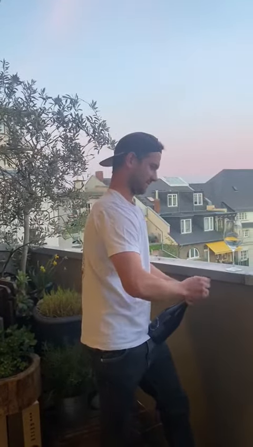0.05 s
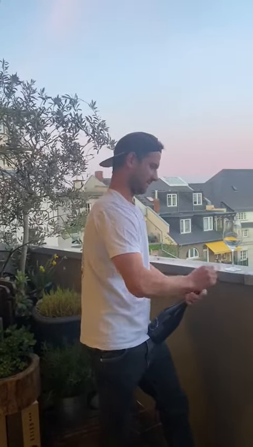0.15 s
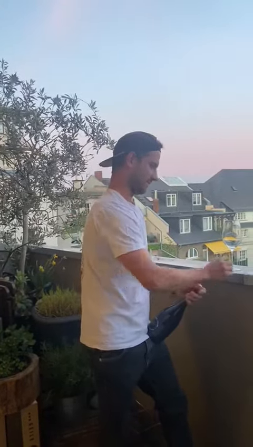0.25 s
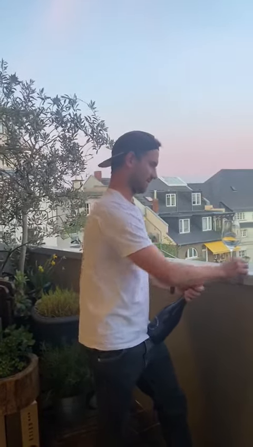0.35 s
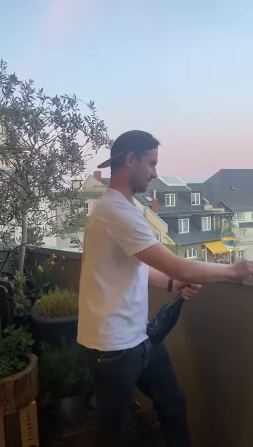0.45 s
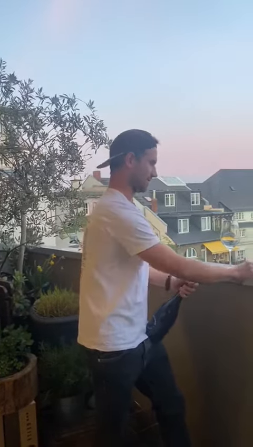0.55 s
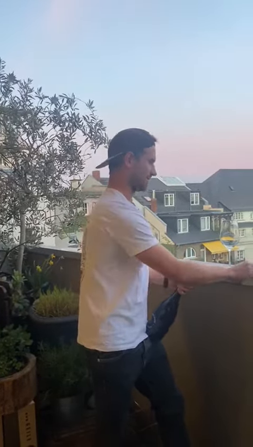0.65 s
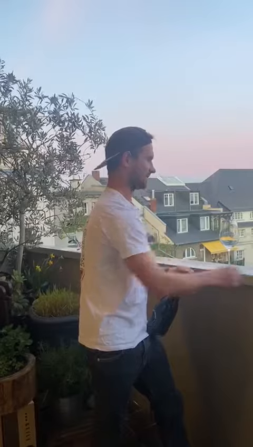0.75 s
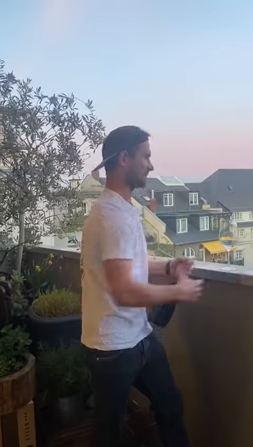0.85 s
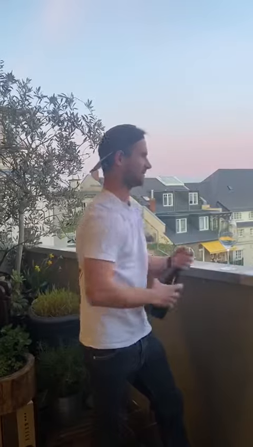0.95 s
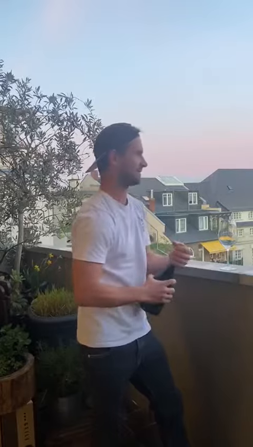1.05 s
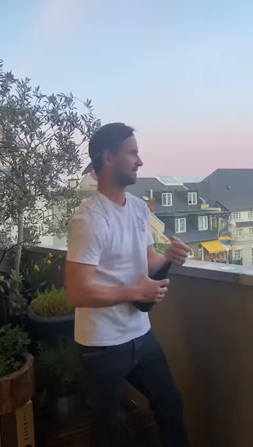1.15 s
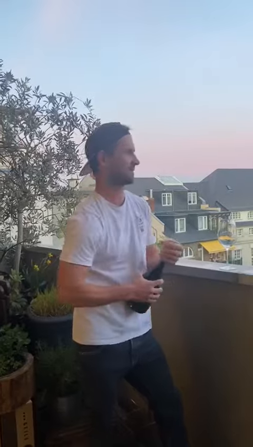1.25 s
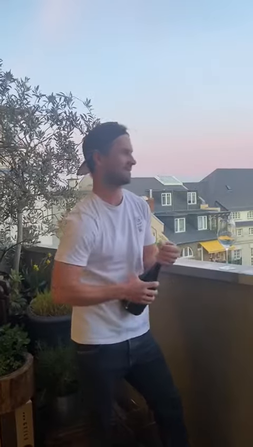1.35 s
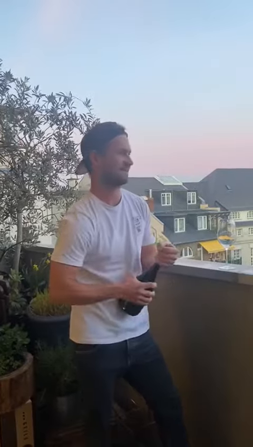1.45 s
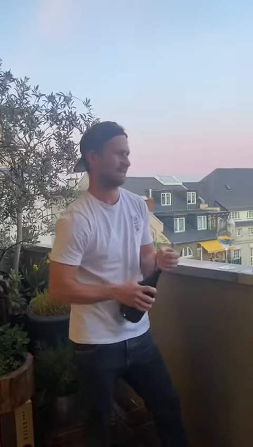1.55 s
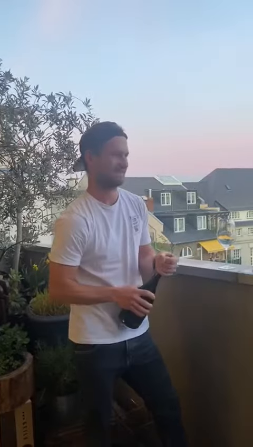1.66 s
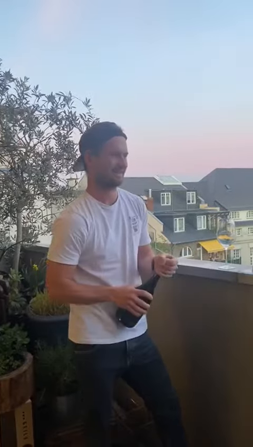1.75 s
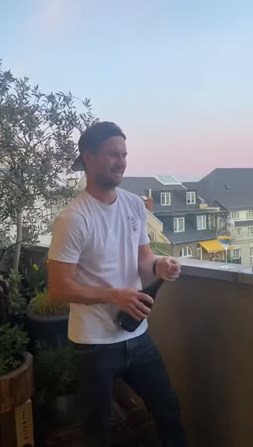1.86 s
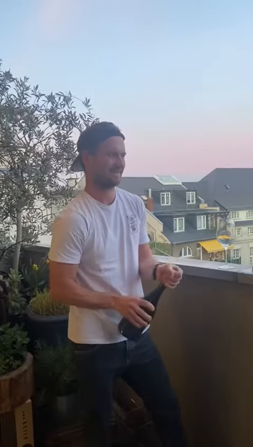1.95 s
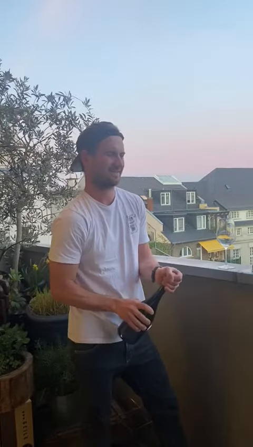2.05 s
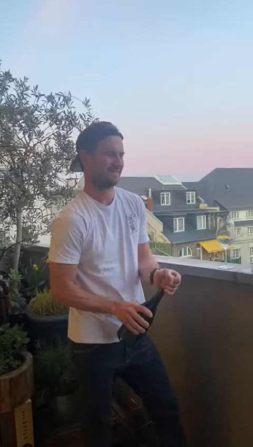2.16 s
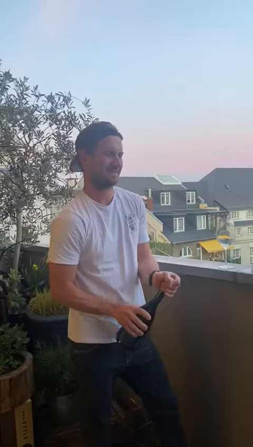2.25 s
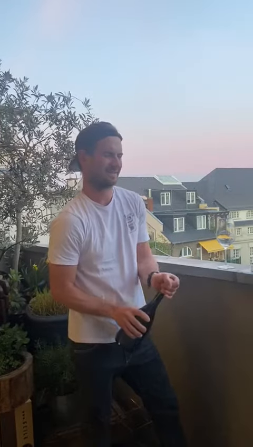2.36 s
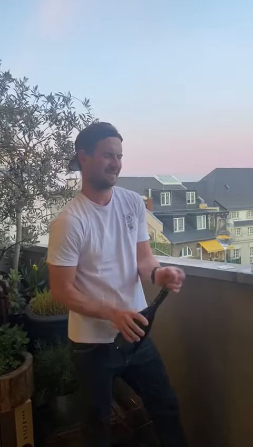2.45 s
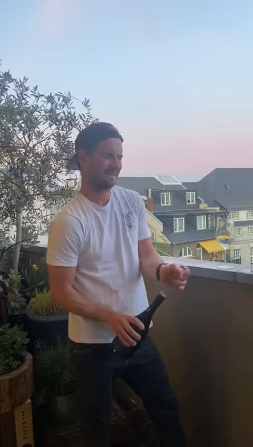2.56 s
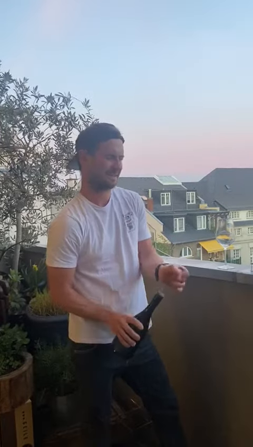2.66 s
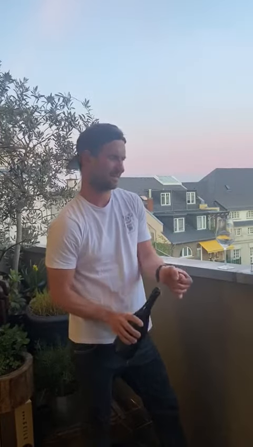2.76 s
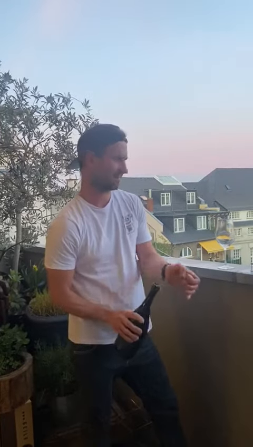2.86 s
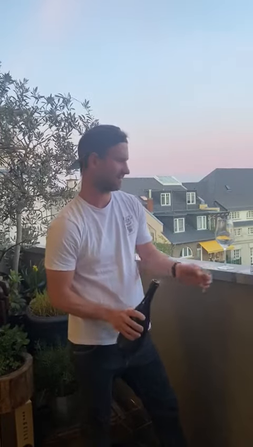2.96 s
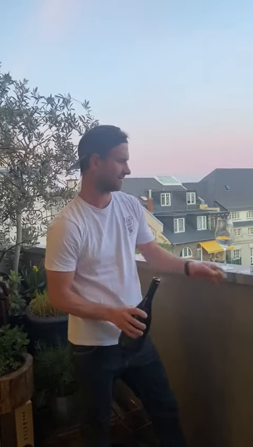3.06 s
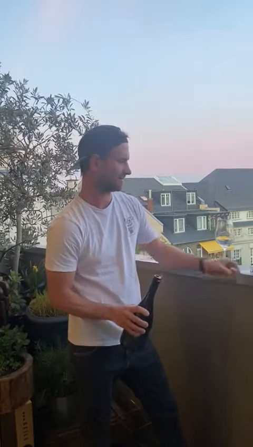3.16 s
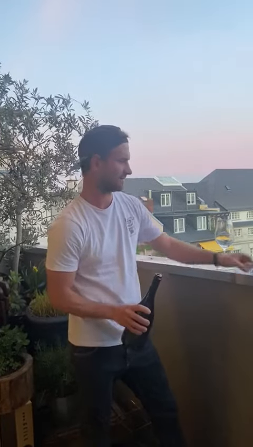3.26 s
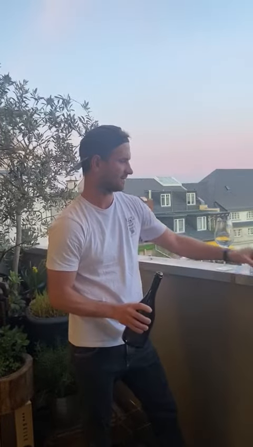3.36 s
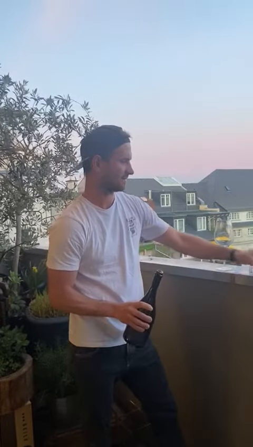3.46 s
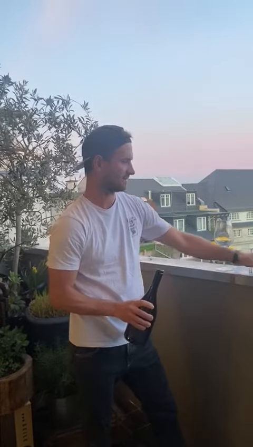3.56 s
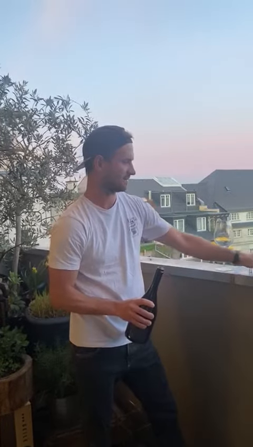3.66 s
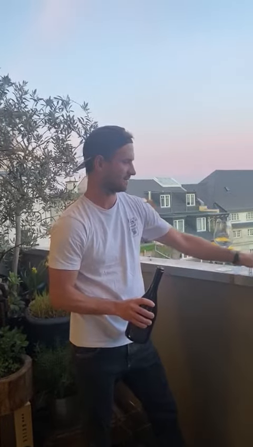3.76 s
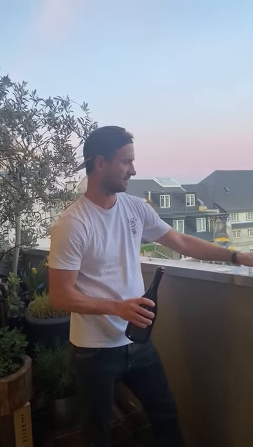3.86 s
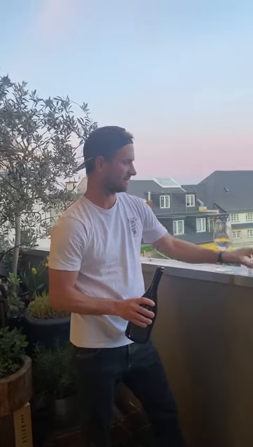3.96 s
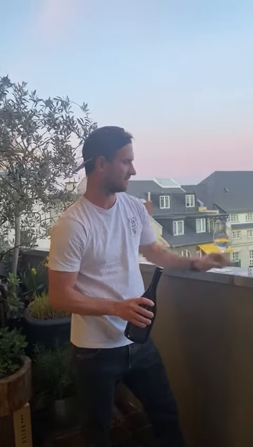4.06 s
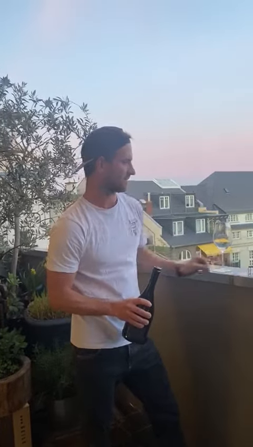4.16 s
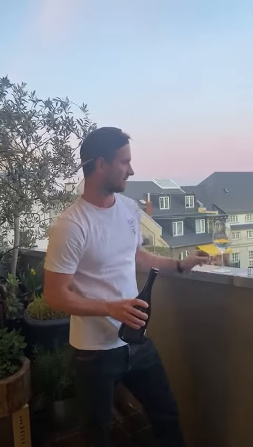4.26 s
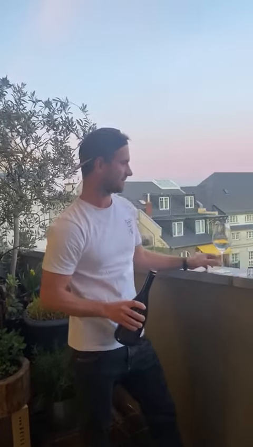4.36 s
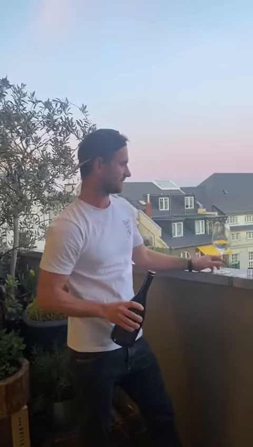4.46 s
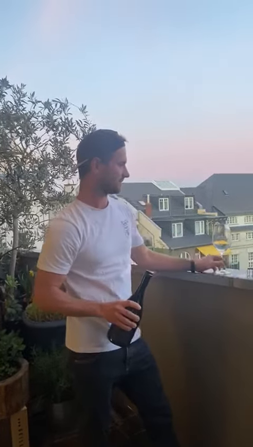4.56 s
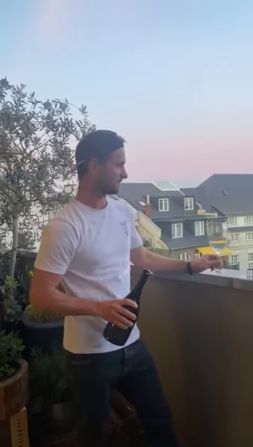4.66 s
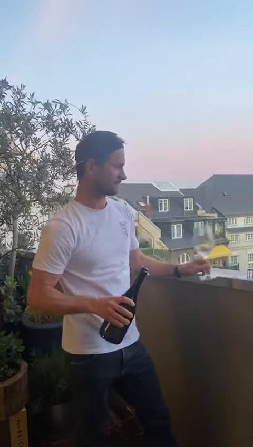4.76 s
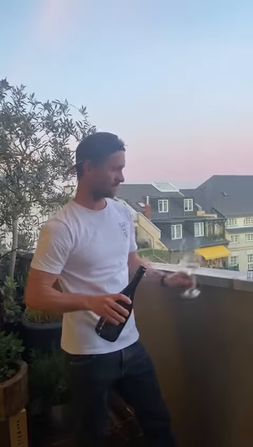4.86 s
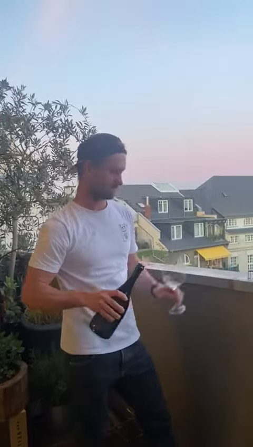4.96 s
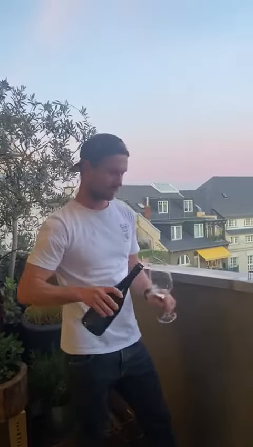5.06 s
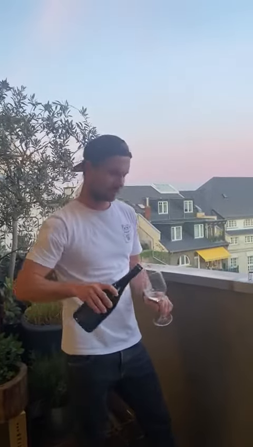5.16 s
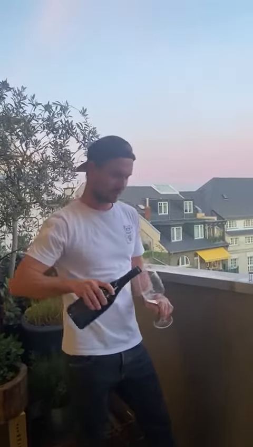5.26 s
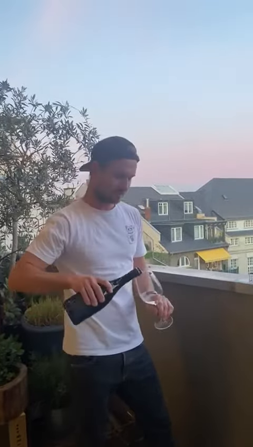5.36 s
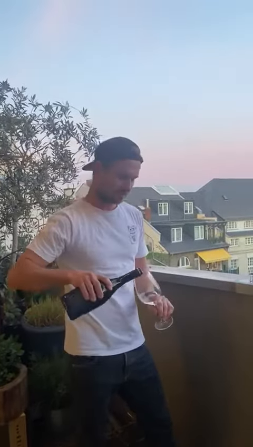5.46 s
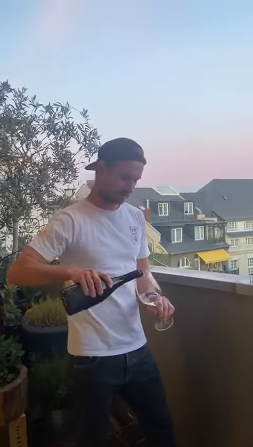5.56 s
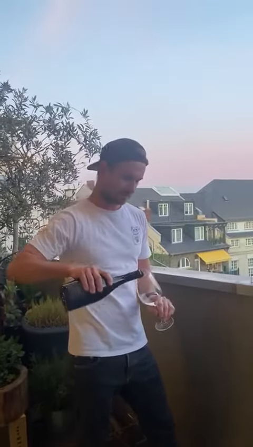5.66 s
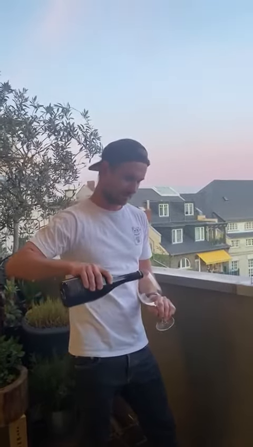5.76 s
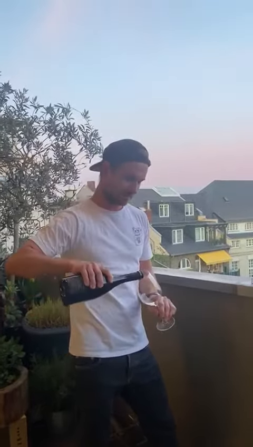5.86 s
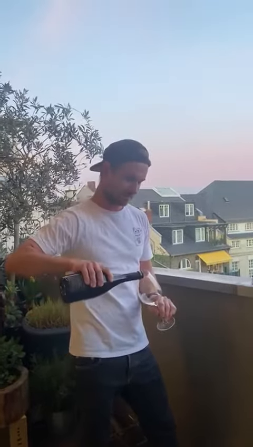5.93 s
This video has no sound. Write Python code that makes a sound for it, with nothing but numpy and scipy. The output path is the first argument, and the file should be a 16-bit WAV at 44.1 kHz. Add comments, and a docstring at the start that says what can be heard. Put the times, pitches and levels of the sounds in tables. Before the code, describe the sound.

Faint distant traffic rumble. Light knocks and wire ticks come first, then one dominant cork pop with a low thump, short breathy fizz and a diffuse tail rolling round the yard. Soft handling follows: a double tap of cork on ledge, two barely audible far hoots, slight cloth rustle and glass judder, finally a bright clink with a tiny rising airy chirp. Outdoor balcony, near walls, phone microphone in stereo.

```python
"""The cork of a sparkling wine bottle pops: broadband crack, damped neck resonances and turbulent hiss.
The balcony walls and the houses opposite return it as discrete reflections and decaying diffuse sound.
Before it, a wire cage is taken off and laid on the ledge; after it, the cork is put down, a wine glass
is picked up and the bottle's neck clinks on it: grainy contacts drive resonant bodies and glass modes.
Behind lie filtered noise for a quiet town and two faint distant hoots."""
import sys
import numpy as np
from scipy import signal
from scipy.fft import rfft, irfft, next_fast_len
from scipy.io import wavfile
from scipy.ndimage import map_coordinates

SR = 44100
rng = np.random.default_rng(int(sys.argv[2]) if len(sys.argv) > 2 else 0)


def store_pcm(level_fs):
    """Save levels as 16-bit WAV."""
    pcm = np.round(np.clip(level_fs, -1, 1) * 32767).astype(np.int16)
    wavfile.write(sys.argv[1], SR, np.atleast_2d(pcm).T)


N = 264247

# All levels are relative. Spectral density means power per Hz, before scaling to unit rms.

POP_S = 2.4271  # the cork leaves the neck
# gas swinging in the neck: f/Hz, level/dB, rise/s, t60/s
NECK_MODES = [(282, 4, .0014, .018), (222, -17, .0018, .11), (340, -20, .006, .11), (74, -21, .0044, .12),
              (564, -13, .005, .075), (482, -20, .005, .12)]
# snap of the cork's edge in the bottle's mouth: f/Hz, level/dB, rise/s, t60/s
SNAP_MODES = [(1090, -11, .0003, 0.016), (3018, -17.5, 0.00019, .03)]
# crack of the seal: f/Hz, spectral density/dB
CRACK_SPECTRUM = [(300, -14), (600, -5.5), (820, 0), (1080, 5), (1500, -0.5), (2200, 3.5), (3000, 4),
                  (4200, -2), (6000, 3), (8000, 3.5), (10000, 0), (13000, -1)]

# hollow ring that lingers after the pop: f/Hz, level/dB, rise/s, t60/s
HOLLOW_MODES = [(598, -20, .045, 0.33), (597, -41, .07, 1.8)]
HOLLOW_STRAY_HZ = 3  # scale of its random pitch
HOLLOW_PHASE_RAD = 2.2  # phase difference between the two ports
# thump rolling round the yard: f/Hz, spectral density/dB
BOOM_SPECTRUM = [(90, -22.5), (200, -3), (350, 2.5), (560, 0), (680, -23.5), (1200, -50)]
BOOM_DB, BOOM_RISE_S, BOOM_T60_S = -38.5, 0.1, 1.25

# gas streams out after the cork; the release is the time to fall by 60 dB
GAS_S, GAS_ATTACK_S, GAS_HOLD_S, GAS_RELEASE_S = 2.445, 0.07, 0.08, 0.5
HISS_DB, WHISTLE_DB = -61.5, -52  # at full flow
WHISTLE_HZ, SAG_HZ_PER_S = 1050, 600  # pitch at full flow, and its fall as the pressure drops
WHISTLE_BEND = 0.055  # share of the pitch lost at no flow
WHISTLE_FADE_DB_PER_S = 55  # the whistle dies before the hiss
# hiss of the gas: f/Hz, spectral density/dB
HISS_SPECTRUM = [(600, -13.5), (2000, 4), (3000, -1.5), (4400, -1), (6000, -8.5), (10000, -22),
                 (13000, -30.5)]

# a short bright echo of the pop off the fronts opposite
POP_ECHO_S, POP_ECHO_HALF_S, POP_ECHO_DB = 2.67, 0.022, -61
# bright part of that echo: f/Hz, spectral density/dB
POP_ECHO_SPECTRUM = [(2000, -25), (2850, 5), (3300, -3), (3900, -5), (6000, -27.5)]

# small knocks of wire cage, cork and glass: t/s, level/dB, low knock/dB, bright tick/dB
TAPS_TABLE = [(0.0439, -52, -18, 7), (0.5046, -38, -3, -1), (0.5072, -35, -2, -9), (0.662, -58, 7, -16),
              (0.6795, -37, -21, -4), (0.6852, -40, -18, -6), (0.7435, -46, -4, -13),
              (0.7524, -44, -4, -18), (0.7674, -45, -6, -14), (0.960, -55, -22, 5),
              (3.7798, -35, -20.5, -11), (3.787, -36, -21, -15), (3.824, -46, -6, -23),
              (3.839, -43.5, -6, -27), (4.9867, -60, -6, 7), (5.007, -44, -12, -18),
              (5.1775, -56.5, -15, -6), (5.718, -62, 9, -21)]
# the low body of a tap: f/Hz, spectral density/dB
KNOCK_SPECTRUM = [(300, -16), (650, -12), (850, 1), (1080, 3), (1500, -3.5), (4000, -30)]
# its middle: f/Hz, spectral density/dB
CLACK_SPECTRUM = [(600, -17), (1350, -10), (1680, 1.5), (1950, -2.5), (2250, -1), (3100, -11), (3750, -5.5),
                  (4500, -14.5), (6000, -19), (10000, -50)]
# its bright edge: f/Hz, spectral density/dB
TICK_SPECTRUM = [(1500, -38.5), (3500, 2.5), (5200, 6), (7000, 4), (10000, 3), (13000, -1)]
PING_S = 0.963  # the wire cage rings once in the hand
# ring of the wire cage: f/Hz, level/dB, rise/s, t60/s
CAGE_MODES = [(2830, -69, .003, 0.12), (4867, -61, 0.0073, 0.11), (9100, -74, .003, .08)]

# the bottle's neck chatters on the rim of the glass: t/s, ring level/dB, click level/dB
RIM_CLINKS = [(5.752, -37.5, -35.5), (5.7567, -51, -42), (5.7703, -43, -48), (5.798, -53, -55)]
# the foot judders on the ledge as the glass is lifted: t/s, ring level/dB, scrape level/dB
FOOT_DRAGS = [(4.5564, -65.5, -61), (4.579, -63, -62), (4.595, -64.5, -56), (4.612, -62, -48)]
# modes of the glass: f/Hz, level struck on the rim/dB, level dragged by the foot/dB, t60/s
GLASS_MODES = [(544.7, -9, -2, 0.17), (1220, -3, -12, 0.087), (2000, 2, -12, 0.045), (2372, -18, 3, 0.17),
               (2570, -8.5, -10, 0.21), (3040, -12, -10, .12), (3520, -9.5, -23, 0.31), (4495, 3, -10, .08),
               (4530, -20, -4, 0.42), (4930, -2.5, -19, 0.16), (5110, -11.5, -17, 0.23),
               (6207, 2.5, -3, 0.12), (6450, -14, 2, 0.15), (6800, -25, 9, 0.11), (7700, -10, -18, 0.19),
               (8400, -12, -16, .15), (8683, -3, -17, 0.1), (9432, -12, -17, 0.17), (9830, -12, -3, 0.16),
               (10950, -5.5, -12, 0.12), (11650, -12, -7, 0.13)]
# clicks and scrapes on the glass: f/Hz, spectral density/dB
CONTACT_SPECTRUM = [(300, -20), (550, -5), (950, 7.5), (1400, -5), (1850, 9), (2400, -4), (3000, -2),
                    (4000, -16), (10000, -8.5), (13000, -18)]
GLASS_STRAY_HZ, GLASS_FLUTTER_DB = 34, 2.6  # touch blurs and shakes each mode: random scales

CHIRP_S, CHIRP_DB, CHIRP_T60_S = 5.756, -43, 0.17  # an airy note rises as the bottle tips
CHIRP_FROM_HZ, CHIRP_TO_HZ, CHIRP_GLIDE_S = 1500, 2390, 0.028

SLIDE_S, SLIDE_HALF_S, SLIDE_DB = 0.31, 0.044, -62  # one stroke of wire off the foil
# wire on foil: f/Hz, spectral density/dB
WIRE_SPECTRUM = [(1500, -8.5), (3800, -12.5), (4600, -1.5), (4950, 8), (5300, -5), (5600, 2.5), (6300, -48),
                 (10000, -15.5), (13000, -23)]
# hands and shirt rubbing: middle t/s, half length/s, level/dB
RUB_STROKES = [(1.179, 0.091, -70.5), (2.288, 0.063, -73.5), (4.585, 0.025, -56), (4.986, 0.035, -56.5),
               (5.095, 0.043, -68)]
# cloth: f/Hz, spectral density/dB
CLOTH_SPECTRUM = [(200, -7.5), (500, 5), (1000, 4.5), (2000, 7), (3000, 0), (5200, 0), (7000, -6.5),
                  (10000, -2), (13000, -11.5)]
FIDGET_DB = -84  # faint rustle throughout

# reflections off near walls, floor and ceiling: delay/s, level/dB, left port lag/ms
WALL_PATHS = [(.0056, -8, .03), (.008, -11, -.04), (0.0103, -7.5, .07), (0.0123, -5.5, -.03),
              (.0137, -9, .08), (0.0207, -15, -.06)]
POP_LAG_MS, HANDLING_LAG_MS = 0.04, 0.035  # how much later the left port hears bottle and ledge
# decay of the balcony: f/Hz, t60/s
BALCONY_DECAY = [(100, .3), (400, 0.22), (2000, 0.19), (5000, 0.19), (11000, 0.13)]
# decay of the yard: f/Hz, t60/s
YARD_DECAY = [(100, 1.9), (500, 1.7), (2000, 1.2), (5000, 0.11), (11000, 0.93)]
# tone of the yard: f/Hz, level/dB
YARD_RESPONSE = [(60, -3), (300, -10.5), (520, -5), (600, -2.5), (820, -3), (1100, -4.5), (2000, -1.5),
                 (4000, 1.5), (6000, -5), (11000, -21)]
# echoes off the fronts opposite: delay/s, level against the yard's ring/dB
HOUSE_ECHOES = [(0.235, -17), (0.422, -19.5)]
# likeness of diffuse sound at left and right: f/Hz, correlation/1
PORT_LIKENESS = [(150, 0.58), (400, 0.32), (1000, 0.51), (2500, 0.067), (10000, 0.1)]

# two faint far-off hoots: middle t/s, f/Hz, level/dB
HOOT_NOTES = [(4.036, 762, -58), (4.147, 753, -60)]
HOOT_HALF_S = 0.0067
# distant town: f/Hz, spectral density/dB
TOWN_SPECTRUM = [(20, -19.5), (40, -6.5), (62, 6), (78, -2.5), (97, -0.5), (135, -9), (275, -8),
                 (400, -15.5), (720, -20.5), (1050, -19.5), (2000, -27.5), (3050, -33.5), (5100, -35),
                 (8000, -52.5), (12000, -53)]

# mid response, where the ports cancel in two narrow bands: f/Hz, level/dB
MID_RESPONSE = [(2400, 0), (2950, -6), (3500, 0), (6100, 0.5), (6900, -13.5), (7900, -17), (8700, 0.5)]
# side response, the phone's stereo width: f/Hz, level/dB
SIDE_RESPONSE = [(100, -18), (240, -20), (330, -5), (450, -1), (600, 2.5), (1000, 1), (1800, -3),
                 (2800, 6.5), (4200, -3), (6000, -2.5), (7500, -1), (9200, -2), (10800, -10.5)]
GAIN_DB, TOP_HZ = 2, 11950  # gain before the peaks are rounded, and upper band limit


def pop():
    """Sudden release: the seal cracks, gas resonates in the neck, a puff follows; bright part and thump."""
    snap = swing(SNAP_MODES, since(POP_S))
    crack = noise(CRACK_SPECTRUM) * bursts([POP_S], [-12], t60=0.035) + snap
    puff = noise(CRACK_SPECTRUM) * bursts([POP_S], [-26.5], t60=0.19)
    thump = -swing(NECK_MODES, since(POP_S + 0.0017))
    return crack + puff, thump


def afterring():
    """Build-up and decay of resonance: a hollow, unsteady note and a low diffuse boom follow the pop."""
    t = since(POP_S)
    hollow = np.zeros(N)
    for hz, db, rise, t60 in HOLLOW_MODES:
        hollow += amp(db) * bloom(t, rise, t60) * wavering(hz, HOLLOW_STRAY_HZ, rate=70)
    rumble = diffuse(np.array([noise(BOOM_SPECTRUM), noise(BOOM_SPECTRUM)]))
    boom = amp(BOOM_DB) * bloom(t, BOOM_RISE_S, BOOM_T60_S) * rumble
    # half the phase difference goes to each port
    at_ports = filtered(hollow, lambda hz: np.exp(np.array([[.5j], [-.5j]]) * HOLLOW_PHASE_RAD))
    return at_ports * amp(2.0 * np.array([wobble(29), wobble(25)])), boom


def gas():
    """Jet noise and lip tone: gas hisses unevenly; pitch rises with flow and sags with pressure."""
    full_s = GAS_S + GAS_ATTACK_S
    attack = np.minimum(since(GAS_S) / GAS_ATTACK_S, 1)
    flow = attack * fade(since(full_s + GAS_HOLD_S), GAS_RELEASE_S)

    draining = np.minimum(since(full_s), GAS_HOLD_S)
    whistle_hz = (WHISTLE_HZ - SAG_HZ_PER_S * draining) * (1 - WHISTLE_BEND * (1 - flow))
    unsteady_hz = whistle_hz * (1 + 0.024 * wobble(200))
    whistle_db = WHISTLE_DB - WHISTLE_FADE_DB_PER_S * since(full_s) + 2.3 * wobble(60)
    whistle = amp(whistle_db) * np.sin(2 * np.pi * np.cumsum(unsteady_hz) / SR)

    fizz = coloured(grains(6000, spread_db=3), HISS_SPECTRUM) * amp(HISS_DB + 1.2 * wobble(76))
    return flow * (fizz + whistle)


def pop_echo():
    """Scattered reflection: the pop's bright echo off the fronts opposite, as a swell of random grains."""
    scattered = coloured(grains(1400, spread_db=5.5), POP_ECHO_SPECTRUM)
    return scattered * amp(POP_ECHO_DB) * swell(POP_ECHO_S, POP_ECHO_HALF_S)


def taps():
    """Impact excitation: sprays of tiny contacts drive a low, a middle and a bright body."""
    s, db, knock_db, tick_db = np.transpose(TAPS_TABLE)
    contacts = unit(grains(15000, spread_db=1.5) * amp(2.7 * wobble(900)))
    knock = resonate(contacts * bursts(s, db + knock_db - 3.5, t60=0.016), KNOCK_SPECTRUM)
    clack = resonate(contacts * bursts(s, db - 9.0, t60=0.037), CLACK_SPECTRUM)
    tick = resonate(contacts * bursts(s, db + tick_db - 4.0, t60=0.021), TICK_SPECTRUM)
    return knock + clack + tick + swing(CAGE_MODES, since(PING_S))


def glass():
    """Modal excitation: each touch clicks and rings the glass; rim and foot favour different modes."""
    rim_s, rim_db, click_db = np.transpose(RIM_CLINKS)
    foot_s, foot_db, scrape_db = np.transpose(FOOT_DRAGS)
    touch_s = np.r_[rim_s, foot_s]
    ring = np.zeros(N)
    for hz, by_rim_db, by_foot_db, t60 in GLASS_MODES:
        struck = bursts(touch_s, np.r_[rim_db + by_rim_db, foot_db + by_foot_db], t60)
        flutter = amp(GLASS_FLUTTER_DB * wobble(130) - 8.5)
        ring += struck * flutter * wavering(hz, GLASS_STRAY_HZ, rate=260)
    touches = bursts(touch_s, np.r_[click_db, scrape_db], t60=0.022)
    return ring + resonate(grains(9000, spread_db=1) * touches, CONTACT_SPECTRUM)


def chirp():
    """Gliding resonance: an airy rising note, perhaps air in the neck as the wine runs into it."""
    t = since(CHIRP_S)
    hz = CHIRP_TO_HZ - (CHIRP_TO_HZ - CHIRP_FROM_HZ) * np.exp(-t / CHIRP_GLIDE_S)
    envelope = amp(CHIRP_DB) * np.minimum(t / CHIRP_GLIDE_S, 1) * fade(t, CHIRP_T60_S)
    return envelope * wavering(hz, 50.1, rate=700)


def rubbing():
    """Stick-slip friction: random slips as wire slides off the foil and hands and clothes shift."""
    wire = coloured(grains(2500, spread_db=2), WIRE_SPECTRUM)
    cloth = coloured(grains(2000, spread_db=3.5) * amp(2.5 * wobble(220)), CLOTH_SPECTRUM)
    strokes = sum(amp(db - 5.5) * swell(s, half) for s, half, db in RUB_STROKES)
    slide = wire * amp(SLIDE_DB) * swell(SLIDE_S, SLIDE_HALF_S)
    return slide + cloth * (strokes + amp(FIDGET_DB))


def near_walls(x, direct_lag_ms, walls_db):
    """Image paths: direct sound and first reflections reach the two ports with their own lags."""
    paths = [(0.00027, 0, direct_lag_ms)]
    paths += [(delay, db + walls_db, lag) for delay, db, lag in WALL_PATHS]
    half = np.array([[1], [-1]]) / 2000  # half of each lag to each port, ms to s
    t = np.arange(-SR // 20, SR // 20 + 1) / SR
    # a sinc places each path between samples
    response = sum(amp(db) * np.sinc(SR * (t - delay - half * lag)) for delay, db, lag in paths)
    return np.array([signal.fftconvolve(x, port, mode="same") for port in response])


def reverb(x, decay, rise):
    """Diffuse-field decay: a noise tail builds up, then each frequency dies at its own speed."""
    hz, t, z = signal.stft(rng.standard_normal((2, 3 * SR // 2)), SR, nperseg=256)
    tail = signal.istft(z * fade(t, along(decay, hz)[:, None]), SR, nperseg=256)[1]
    tail = tail * (1 - np.exp(-(np.arange(tail.shape[1]) / SR / rise) ** 2))
    tail = tail / np.linalg.norm(tail[0])
    return diffuse(signal.fftconvolve(x[None], tail, axes=1)[:, :N])


def yard(x):
    """Late reverberation and echo: the yard rings on and house fronts return dull, blurred echoes."""
    far = filtered(x, lambda hz: amp(along(YARD_RESPONSE, hz) - 17))
    dull_hz = 3500

    def fronts(hz):
        """Pure delays as phase rotation, behind a low-pass."""
        delays = sum(amp(db) * np.exp(-2j * np.pi * hz * delay) for delay, db in HOUSE_ECHOES)
        return delays / (1 + (hz / dull_hz) ** 4)

    echoes = filtered(far, fronts)
    return reverb(far, YARD_DECAY, rise=0.0067) + reverb(echoes, BALCONY_DECAY, rise=0.0095)


def hoots():
    """Tone bursts: short soft sines from somewhere in the town."""
    t = np.arange(N) / SR
    return sum(amp(db) * swell(s, HOOT_HALF_S) * np.sin(2 * np.pi * hz * t) for s, hz, db in HOOT_NOTES)


def town():
    """Diffuse filtered noise: far traffic as a low rumble whose level drifts a little."""
    rumble = unit(diffuse(np.array([noise(TOWN_SPECTRUM), noise(TOWN_SPECTRUM)])))
    return rumble * amp(-58.0 + 0.74 * wobble(2.1))


def amp(db):
    """Logarithmic level: decibels to gain."""
    return 10 ** (np.asarray(db) / 20)


def unit(x):
    """Normalisation to rms 1."""
    return x / np.sqrt(np.mean(x ** 2) + 1e-20)


def along(points, hz):
    """Interpolation of (f/Hz, value) points on a log frequency axis."""
    f, v = np.transpose(points)
    return np.interp(np.log(hz + 1), np.log(f), v)


def since(s):
    """Causal time: seconds since s, zero before it."""
    return np.maximum(np.arange(N) / SR - s, 0)


def fade(t, t60):
    """Exponential damping: 60 dB in t60."""
    return np.exp(-np.log(1000) * t / t60)


def bloom(t, rise, t60):
    """Resonant build-up followed by exponential damping."""
    return (1 - np.exp(-(t / rise) ** 2)) * fade(t, t60)


def swell(s, half):
    """Gaussian envelope: a bell around s."""
    return np.exp(-((np.arange(N) / SR - s) / half) ** 2 / 2)


def bursts(times, levels_db, t60):
    """Impulsive onset: an envelope that jumps at each time and dies away."""
    envelope, tail = np.zeros(N + SR), fade(np.arange(SR // 2) / SR, t60)
    for s, db in zip(times, levels_db):
        envelope[round(s * SR):][:len(tail)] += amp(db) * tail
    return envelope[:N]


def swing(modes, t):
    """Modal superposition: resonances that build up and die."""
    return sum(amp(db) * bloom(t, rise, t60) * np.sin(2 * np.pi * hz * t) for hz, db, rise, t60 in modes)


def wobble(rate):
    """Random modulation: normal knots, rate a second, joined by straight lines."""
    knots = rng.standard_normal(int(N * rate / SR) + 4)
    return map_coordinates(knots, [np.arange(N) * rate / SR], order=1)


def wavering(hz, stray_hz, rate):
    """Frequency modulation: a sine whose pitch strays at random, rate knots a second."""
    cycles = np.cumsum(hz + stray_hz * wobble(rate)) / SR
    return np.sin(2 * np.pi * (cycles + rng.random()))


def grains(rate, spread_db):
    """Random impulses: rate a second on average, of very unequal sizes, rms 1."""
    slips = rng.random(N) < rate / SR
    return unit(slips * rng.standard_normal(N) * amp(spread_db * rng.standard_normal(N)))


def filtered(x, response):
    """Linear filtering: the spectrum of x times a response of frequency."""
    size = next_fast_len(N + SR // 2)
    return irfft(rfft(x, size) * response(np.fft.rfftfreq(size, 1 / SR)), size)[..., :N]


def coloured(x, spectrum):
    """Spectral shaping of x, scaled to rms 1."""
    return unit(filtered(x, lambda hz: amp(along(spectrum, hz))))


def noise(spectrum):
    """Coloured Gaussian noise of rms 1."""
    return coloured(rng.standard_normal(N), spectrum)


def resonate(x, spectrum):
    """Minimum-phase resonance: x rings through a body; white noise keeps its rms."""
    log_gain = np.log(unit(amp(along(spectrum, np.abs(np.fft.fftfreq(2048, 1 / SR))))))
    # the Hilbert transform of the log gain gives the minimum phase
    response = np.fft.ifft(np.exp(np.conj(signal.hilbert(log_gain)))).real
    return signal.fftconvolve(x, response)[:N]


def diffuse(x):
    """Spatial coherence: two unrelated channels gain the likeness of two close ports."""
    turn = lambda hz: np.arccos(np.clip(along(PORT_LIKENESS, hz), -1, 1)) / 2
    mid, side = filtered(x, lambda hz: np.array([np.cos(turn(hz)), np.sin(turn(hz))]))
    return np.array([mid + side, mid - side])


def scene():
    """Superposition: all sources on the balcony, answered by its walls and by the yard."""
    crack, thump = pop()
    hollow, boom = afterring()
    airy = gas() + pop_echo()
    handling = taps() + glass() + chirp() + rubbing()
    direct = crack + thump + handling
    close_pop = near_walls(crack + thump, POP_LAG_MS, walls_db=0.2)
    close_handling = near_walls(handling, HANDLING_LAG_MS, walls_db=-3.0)
    # the open balcony holds the crack better than the low thump
    sent = amp(-11.0) * crack + amp(-13.5) * thump + amp(-2.0) * handling + amp(-3.0) * airy
    balcony = reverb(sent, BALCONY_DECAY, rise=0.011)
    lingering = (hollow + airy) * amp([[1.8], [-1.8]])  # stronger on the left
    return close_pop + close_handling + balcony + yard(direct) + lingering + boom + hoots() + town()


def record(dry):
    """Mid-side pick-up: the phone narrows the bass, colours mid and side, rounds peaks, limits the band."""
    mid = filtered((dry[0] + dry[1]) / 2, lambda hz: amp(along(MID_RESPONSE, hz)))
    side = filtered((dry[0] - dry[1]) / 2, lambda hz: amp(along(SIDE_RESPONSE, hz)))
    pair = amp(GAIN_DB) * np.array([mid + side, mid - side])
    rounded = pair / (1 + (pair / .92) ** 8) ** (1 / 8)
    return filtered(rounded, lambda hz: 1 / np.sqrt(1 + (hz / TOP_HZ) ** 160))


dry = scene()
out = record(dry)
store_pcm(out)
```